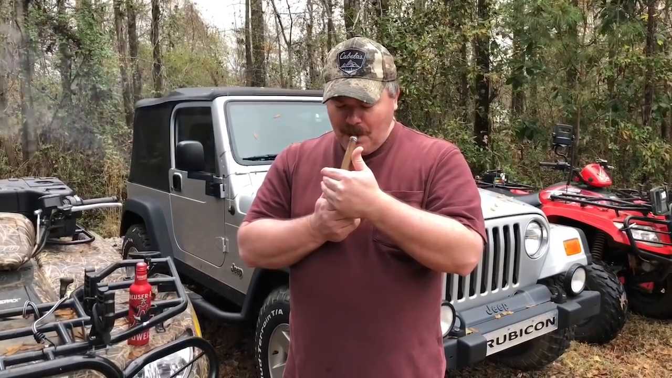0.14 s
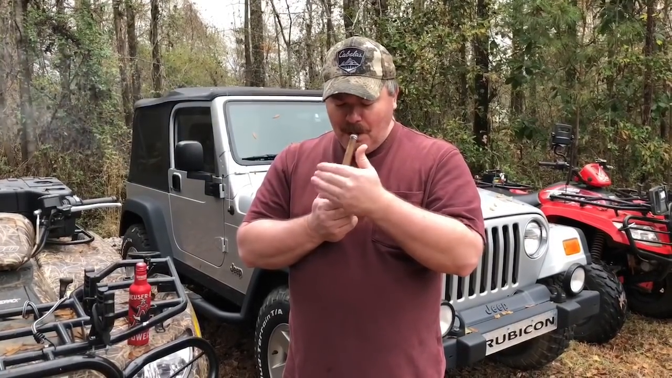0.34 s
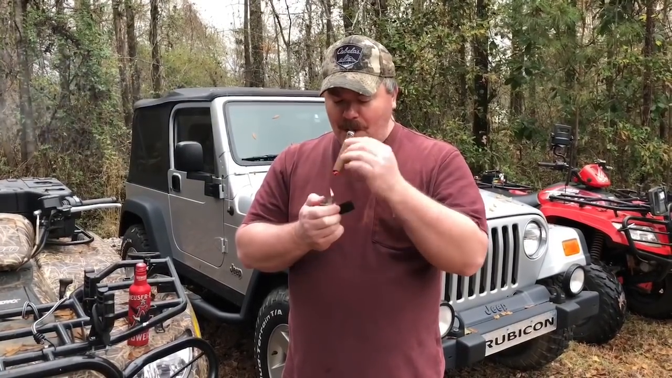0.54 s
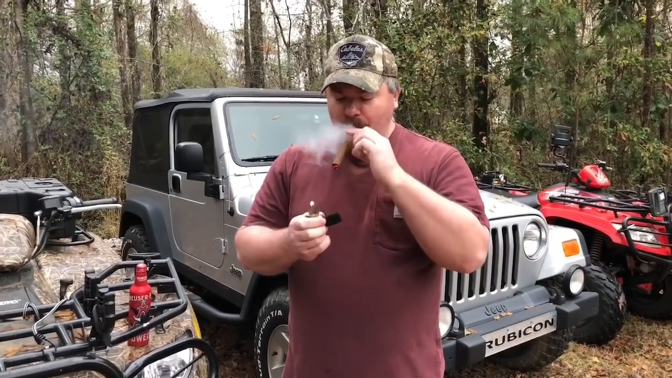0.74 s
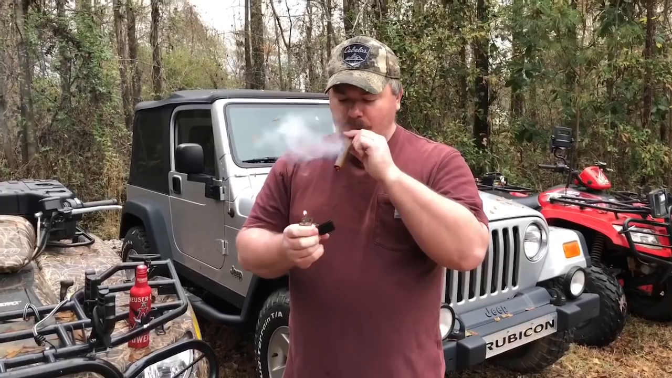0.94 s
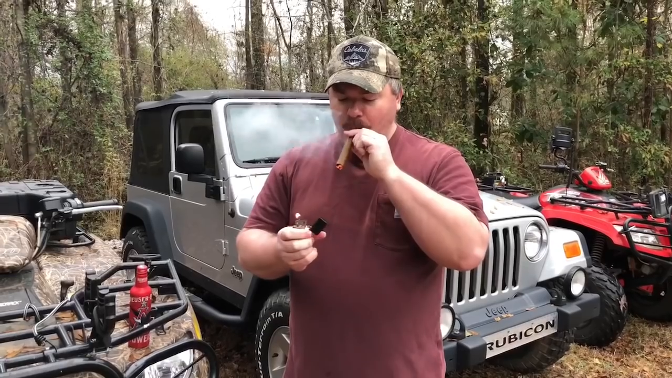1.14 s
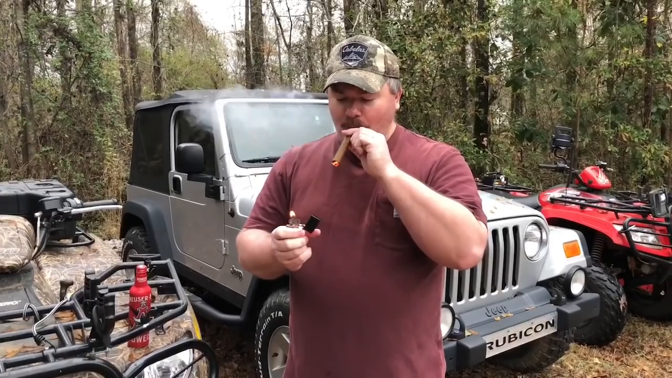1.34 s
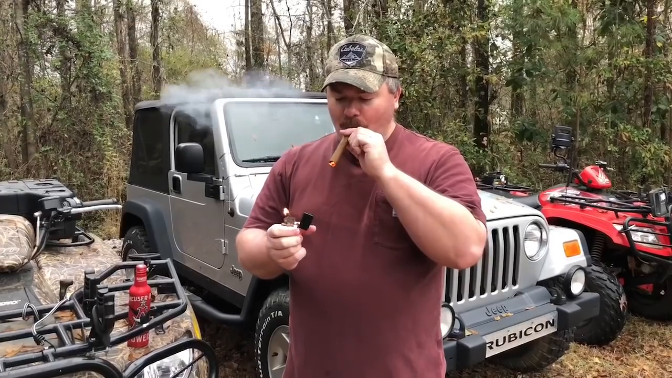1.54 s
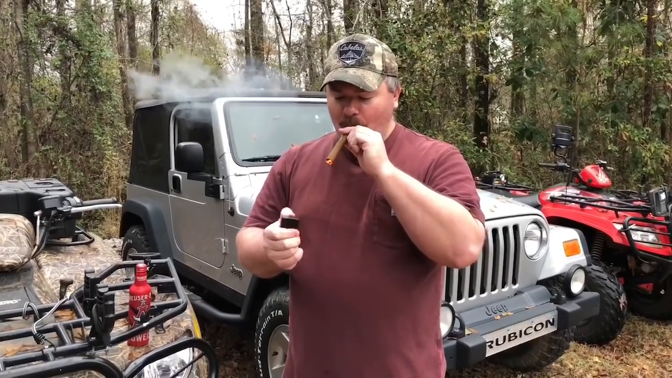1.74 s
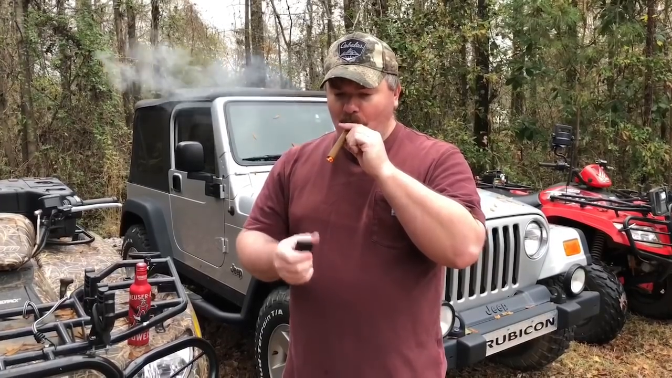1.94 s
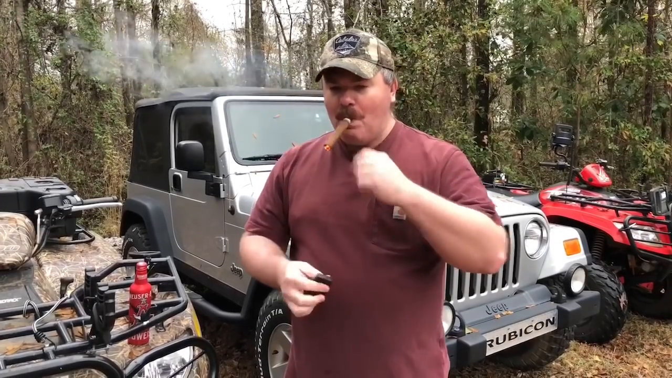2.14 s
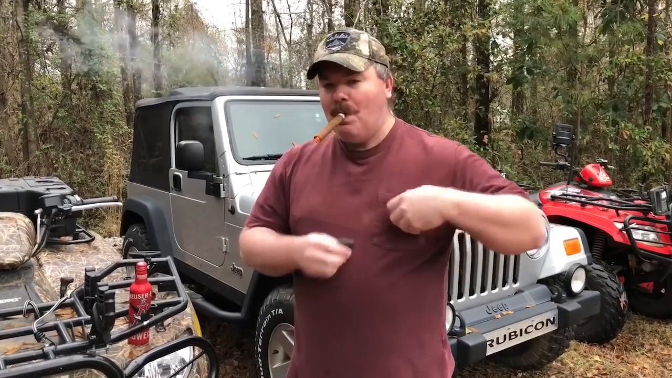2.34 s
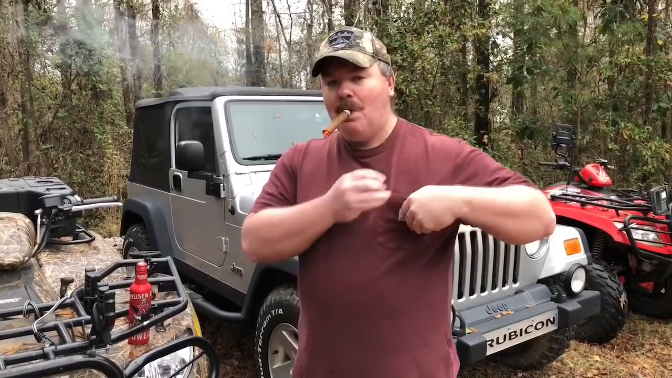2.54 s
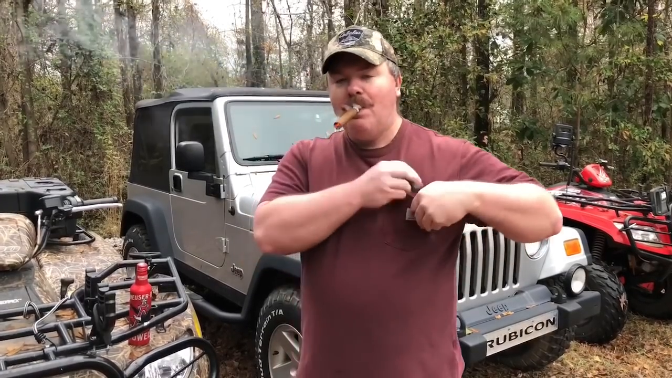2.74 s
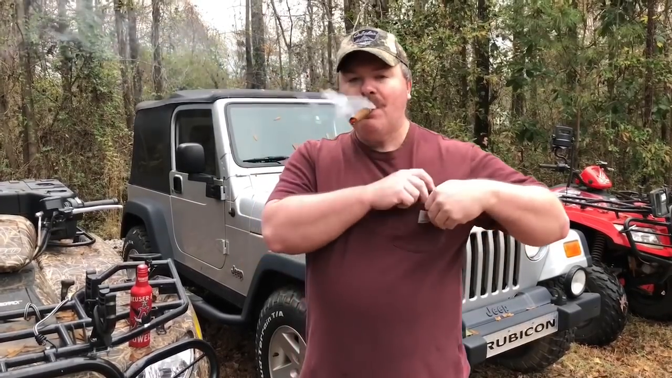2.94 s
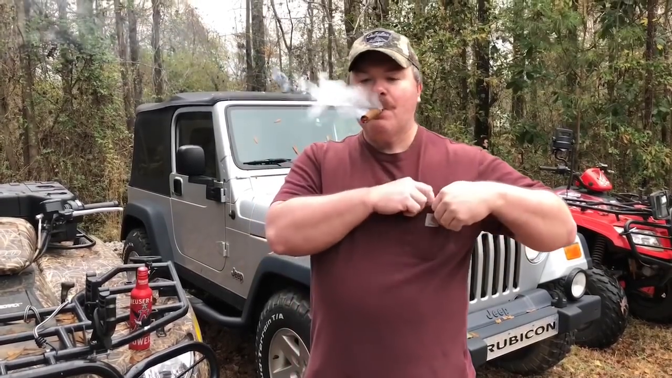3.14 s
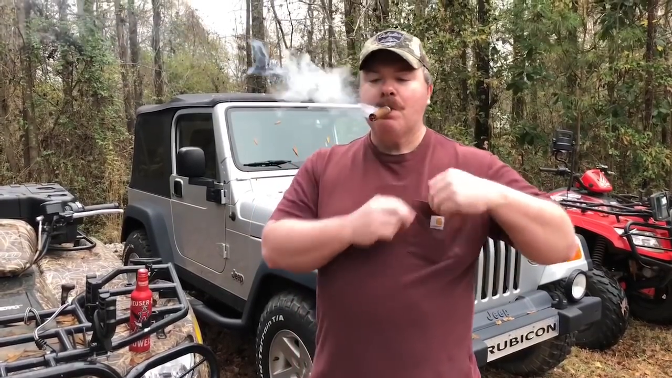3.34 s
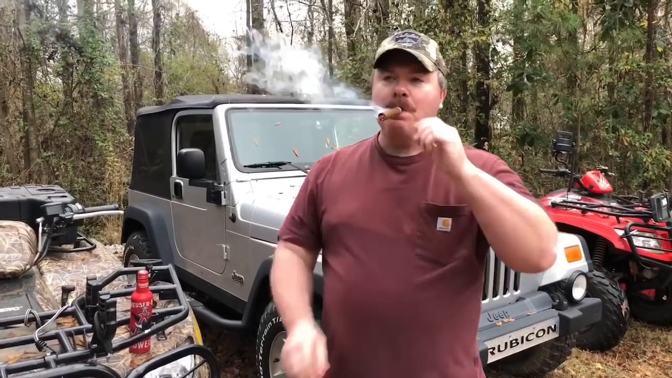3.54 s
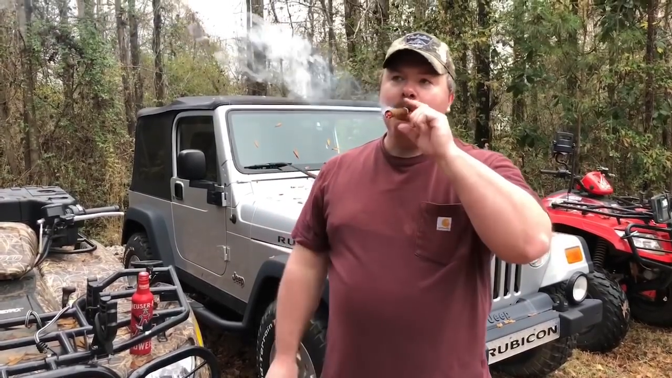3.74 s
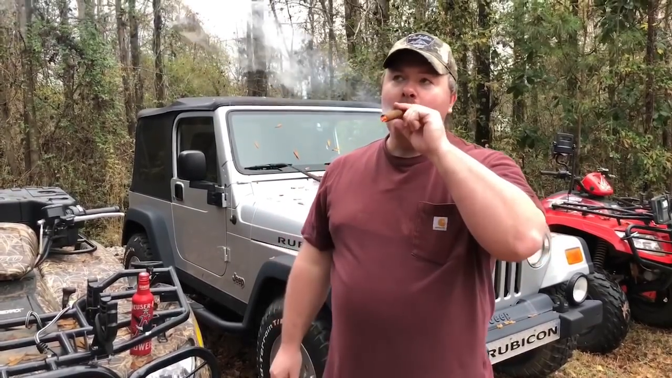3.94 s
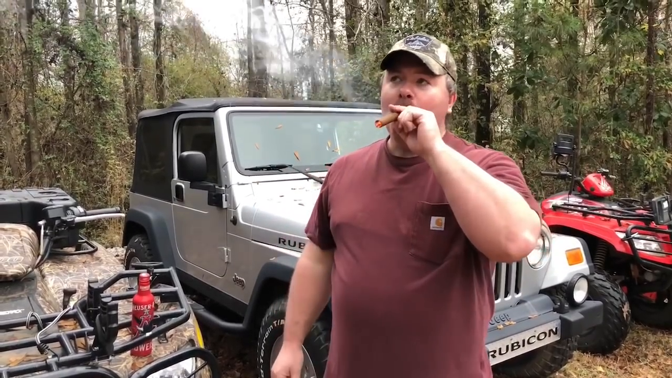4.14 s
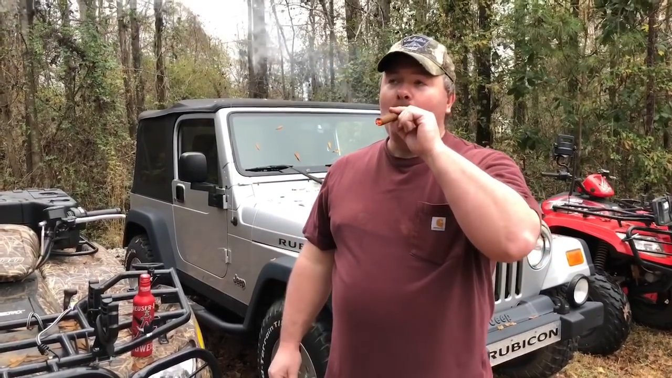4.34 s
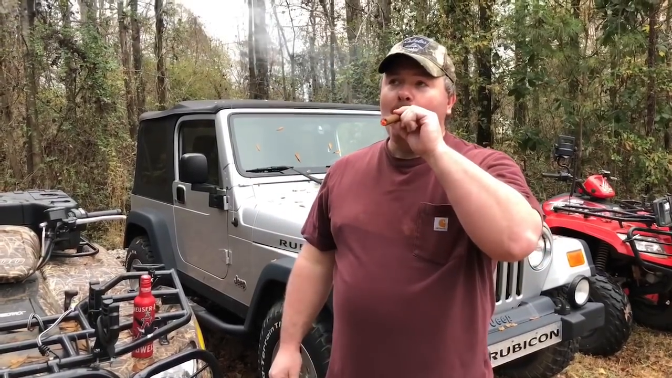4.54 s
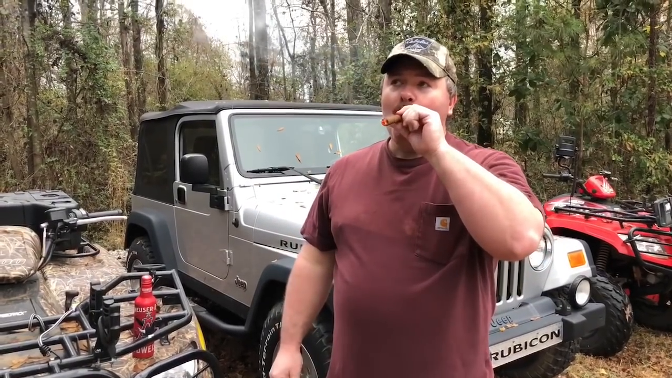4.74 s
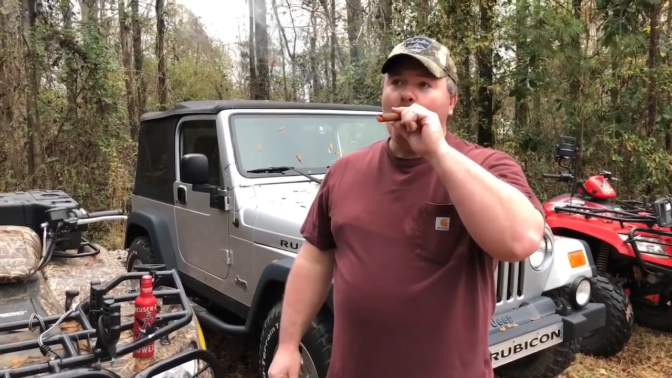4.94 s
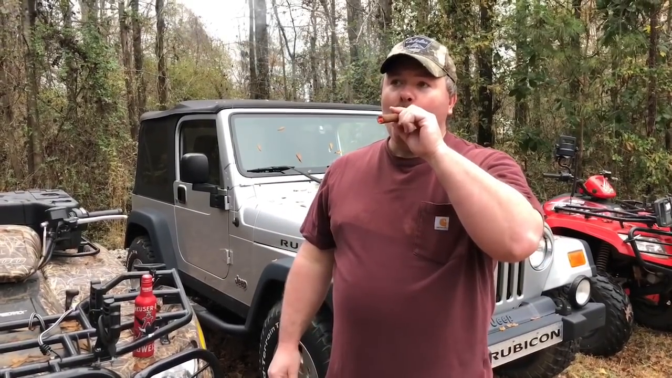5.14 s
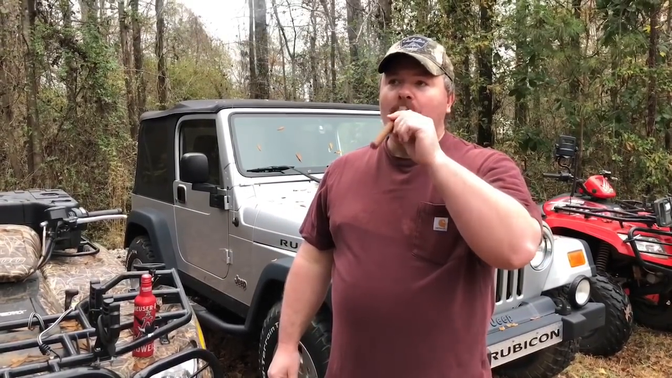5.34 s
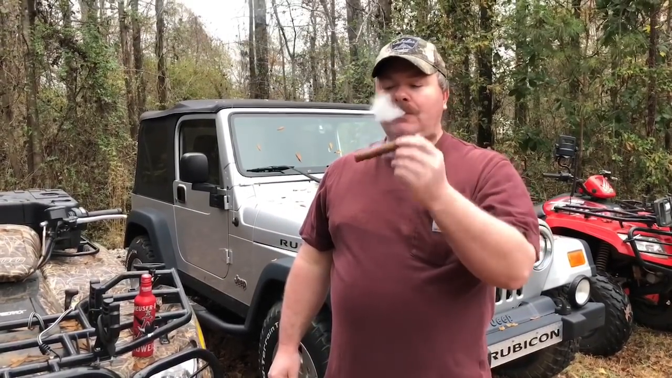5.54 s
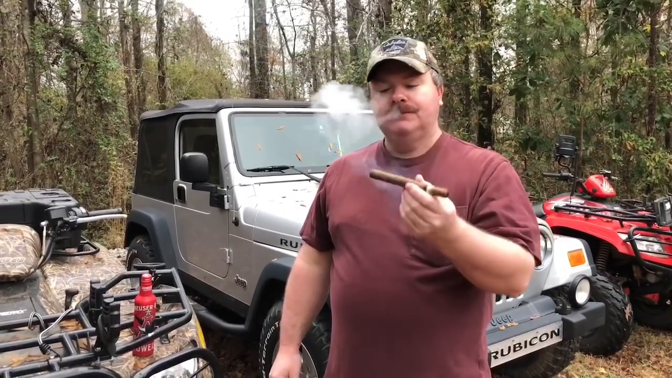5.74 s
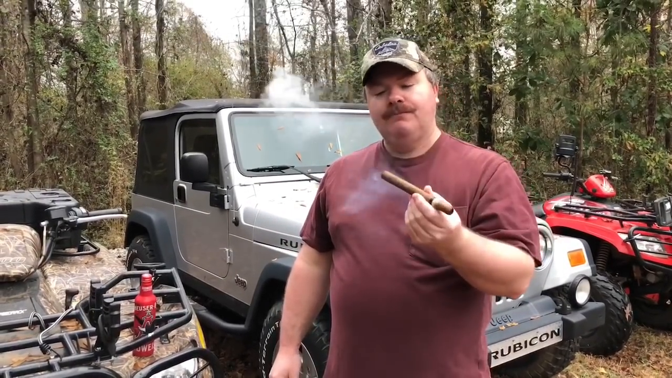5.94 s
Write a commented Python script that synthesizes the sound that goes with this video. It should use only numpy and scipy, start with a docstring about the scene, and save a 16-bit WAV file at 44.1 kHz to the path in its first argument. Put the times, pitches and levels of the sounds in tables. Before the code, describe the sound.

Quiet woodland air with a low distant traffic murmur; a metal lid clicks shut loudly once, then faint fumbling ticks and sparse thin birdsong.

```python
"""A small metal lighter lid snaps shut a few metres away, in a wood beside parked vehicles: a burst of
contacts excites the damped modes of lid and case, and vehicles, ground and trunks answer diffusely.
Two kinds of songbird whistle gliding tones among the trunks; fingers, cloth and leaves give short
noise puffs and a crackly brushing. A road murmurs as shaped noise, leaves rustle, a distant machine
hums as a drifting sine, a low fuzzy note comes and goes and the microphone hisses."""
import sys
import numpy as np
from scipy import signal
from scipy.fft import rfft, irfft, next_fast_len
from scipy.io import wavfile
from scipy.ndimage import uniform_filter1d, map_coordinates

SR = 44100
rng = np.random.default_rng(int(sys.argv[2]) if len(sys.argv) > 2 else 0)


def wav_record(signal):
    """Record a signal, one row per channel, as 16-bit PCM in the file named by sys.argv[1]."""
    frames = np.transpose(np.atleast_2d(signal))
    bounded = np.clip(frames, -1, 1)
    # unit amplitude maps onto the largest positive 16-bit level
    quanta = np.round(bounded * 32767).astype(np.int16)
    wavfile.write(sys.argv[1], SR, quanta)


N = 264776  # length in samples

# far road, level over time: time_s, rumble_db, tyre_db
ROAD_LEVELS = [(0.0, -48.5, -55), (0.45, -52, -54.5), (1.3, -50.5, -54), (2.26, -52, -53.5),
               (2.57, -49.5, -54), (6.0, -53, -55)]
# relative spectrum of the road rumble: frequency_hz, level_db
RUMBLE_SPECTRUM = [(15, -65), (28, -28.5), (40, -10.5), (53, -8), (61, 3), (70, -2.5), (95, 1), (125, -6),
                   (160, -6.5), (215, -13.5), (450, -24), (900, -63)]
# relative spectrum of the tyre wash: frequency_hz, level_db
TYRE_SPECTRUM = [(150, -31.5), (300, -6), (500, -5.5), (800, 2.5), (1400, -1), (2100, -9), (3000, -22),
                 (5000, -37.5)]
# relative spectrum of the leaves: frequency_hz, level_db
LEAF_SPECTRUM = [(1000, -24), (2500, 5.5), (4500, -1), (7000, -10.5), (10000, -24.5)]
# relative spectrum of the microphone self-noise: frequency_hz, level_db
HISS_SPECTRUM = [(2000, -16), (6000, 1), (8500, 1), (11500, -6), (14500, -4), (17200, -6)]
# level of the machine hum over time: time_s, level_db
HUM_LEVELS = [(0, -66.5), (1.3, -62.5), (2.8, -63), (3.3, -67), (6, -70.5)]
# swells of a faint airy rustle: peak_s, length_s, level_db
RUSTLE_SWELLS = [(.2, 0.55, -88), (4.82, 0.27, -83), (5.499, .4, -85.5)]
# faint ticks of fingers, cloth and leaves, and near 2.88 s a double click of the lighter dropping into a
# pocket: start_s, peak_db, centre_hz, width_octaves
TICK_EVENTS = [(.743, -58, 7500, 1), (.835, -59, 14000, 1), (.955, -67, 4000, 1), (1.668, -59, 13000, 1.5),
               (1.6795, -51, 12000, 1.5), (1.717, -59, 14000, 1), (1.929, -55.5, 8000, 1),
               (2.297, -62, 6000, .6), (2.361, -54.5, 4510, 0.63), (2.452, -60, 13000, 0.94),
               (2.49, -59.5, 14000, 1), (2.8375, -50, 3920, 0.4), (2.842, -55, 4000, .5),
               (2.8762, -53, 6500, .8), (2.8785, -45, 3100, .7), (2.894, -56, 4000, .6),
               (2.9858, -50, 13000, 1.4), (3.405, -56.5, 6020, 1), (3.695, -48, 14000, 1),
               (3.809, -58, 9000, .5), (3.852, -51, 5980, 1), (3.908, -45, 9070, 2.5),
               (3.947, -52, 12000, 1.6), (3.954, -58, 12000, 1.5), (3.985, -60.5, 10000, 1.5),
               (4.017, -57, 13000, 1), (4.071, -47.5, 6000, 1.5), (4.22, -54, 8980, 1.05),
               (4.257, -60.5, 9500, .6), (4.272, -55, 6000, 2)]
# thin high bird, a quick fall onto a held pitch: start_s, length_s, climb_s, top_hz, held_hz, level_db
HIGH_NOTES = [(.637, 0.036, .008, 8020, 7430, -57.5), (1.072, 0.03, .002, 8000, 7280, -70),
              (1.43, .04, 0.0018, 8200, 7640, -80), (2.643, 0.036, .002, 8370, 7300, -72),
              (3.038, 0.034, .002, 8800, 7420, -61.5), (4.975, 0.1, .002, 7900, 7480, -86),
              (5.085, 0.036, 0.0021, 7920, 7470, -82)]
# lower bird, a hooked note that shoots up and sags: start_s, length_s, climb_s, top_hz, end_hz, level_db
HOOKED_NOTES = [(3.549, 0.047, 0.015, 4650, 4120, -66.5), (3.907, 0.056, 0.012, 4580, 4270, -67),
                (4.198, 0.045, .013, 4600, 4300, -67.5), (4.495, 0.041, .012, 4420, 4220, -68.5),
                (4.983, 0.036, .012, 4480, 4150, -72)]
# fainter notes like the lower bird's, levels before the mix: start_s, length_s, start_hz, end_hz, level_db
FAR_NOTES = [(2.005, 0.062, 4760, 4450, -80), (2.1, .05, 4500, 4460, -83), (2.233, .03, 4520, 4200, -76),
             (2.32, .04, 3720, 3690, -85), (2.42, .05, 3885, 3900, -78.5), (2.5, .09, 4500, 4470, -83),
             (4.251, .023, 4400, 3190, -71), (4.56, .07, 4280, 4150, -85), (4.685, .035, 3900, 3900, -79),
             (4.905, .035, 3760, 3620, -82), (5.02, .14, 4490, 4480, -82), (5.21, .035, 4660, 4070, -72),
             (5.298, 0.062, 4020, 4000, -82.5)]
# lid contacts, levels before the common gain; tilt pivots on 4 kHz and is flat below 1 kHz:
# start_s, level_db, tilt_db_per_octave, rattle_t60_s
LID_CONTACTS = [(1.7215, -50, -9.5, .01), (1.743, -46.5, 1.5, .004), (1.7494, -35, -3.5, 0.0065),
                (1.761, -46.5, -7.5, .01), (1.7636, -21, 5.5, 0.022), (1.7655, -21, 5, 0.025),
                (1.7656, -1, -1, 0.0045), (1.7653, -18.5, 4, 0.00797), (1.7678, -17, 2, .008)]
# resonant modes of lid and case: centre_hz, width_hz, relative_level_db
CASE_MODES = [(1304, 170, -7), (1817, 130, 0.5), (1945, 45, -2.5), (2340, 8, -8), (2380, 35, -5),
              (2750, 200, -2), (3220, 120, -8.5), (4100, 750, -0.7), (4900, 420, -2), (6200, 690, -5),
              (8700, 380, -11.5), (10055, 450, -1.5), (12350, 320, -5), (15100, 455, -1), (15730, 370, -9),
              (16700, 450, -3)]
# the snap summed over all directions: frequency_hz, level_db
SNAP_POWER = [(800, -39.5), (1300, 2), (2400, 4.5), (5000, 2), (8000, -1.5), (10000, 1), (12000, 1.5),
              (17000, 4)]
# strokes of cloth brushing as arms move: peak_s, peak_db, fade_db_per_s
CLOTH_STROKES = [(2.41, -76, 70), (3.15, -76, 120), (3.29, -81, 110.5), (3.94, -73, 80), (4.26, -83, 110),
                 (4.89, -86, 80)]
# decay of the answer from vehicle bodies and ground: frequency_hz, t60_s
VEHICLE_DECAY = [(1000, 0.066), (3000, 0.062), (16000, 0.034)]
# decay of the answer from the trunks: frequency_hz, t60_s
TRUNK_DECAY = [(1000, 0.84), (4500, .6), (8000, 0.48), (16000, 0.22)]
# decay of the answer from branches around the birds: frequency_hz, t60_s
BRANCH_DECAY = [(3000, .12), (9000, 0.13)]

AIR_HZ = 17500  # noise beds, ticks, hinge scrape and echo tails are cut above this
TOP_HZ, HEADROOM = 19084, .8  # band limit and soft ceiling (full scale = 1) of the input stage
LEAVES_DB = -73.5
HUM_HZ, HUM_DRIFT_HZ = 293.9, 1.3
DRONE_DB, DRONE_SWING_DB, DRONE_PER_S = -68.5, 5, 4.5
STRAY_PER_S, STRAY_LOWEST_DB, STRAY_HZ = 1.5, -67, 11000  # fainter ticks at random moments
# a falling tick ahead of each hooked note; its level is relative to that note
LEAD_BEFORE_S, LEAD_S, LEAD_TOP_HZ, LEAD_END_HZ, LEAD_DB = .033, 0.0127, 5500, 3500, -5
ONSET_S = .002  # time that notes without a climb stay on their top pitch
SWING_S, SWING_LENGTH_S, SWING_DB = 1.7505, .0128, -46.5  # the hinge scrapes while the lid swings
RATTLE = .07  # starting rms of the loose chatter after a contact, relative to the blow
BRUSH_RISE_DB_PER_S = 250


def amp(db):
    """Decibel law: twenty dB is a tenfold amplitude."""
    return 10 ** (np.asarray(db) / 20)


def unit(x):
    """Power normalisation: the rms becomes 1."""
    return x / np.sqrt(np.mean(x ** 2) + 1e-20)


def along(points, hz):
    """Logarithmic frequency scale: values interpolate linearly between points in log frequency."""
    f, v = np.transpose(points)
    return np.interp(np.log(hz + 1), np.log(f + 1), v)


def curves(rows):
    """Linear interpolation in time: each column after the time becomes one value per sample."""
    s, *columns = np.transpose(rows)
    return [np.interp(np.arange(N) / SR, s, column) for column in columns]


def wobble(rate):
    """Band-limited fluctuation: a spline through random knots, rate of them a second."""
    knots = rng.standard_normal(int(N * rate / SR) + 4)
    return map_coordinates(knots, [np.arange(N) * rate / SR])


def ramp(s, length, attack, release):
    """Amplitude envelope: linear attack, hold and linear release, over the whole track."""
    t = np.arange(N) / SR - s
    return np.clip(np.minimum(t / attack, (length - t) / release), 0, 1)


def sine(hz):
    """Frequency modulation: phase is the running sum of frequency; the rms is about 1."""
    return np.sqrt(2) * np.sin(2 * np.pi * np.cumsum(hz) / SR)


def filtered(x, response):
    """Linear filtering: the spectrum of x is multiplied by a complex response of frequency."""
    m = next_fast_len(len(x) + 8192)
    return irfft(rfft(x, m) * response(np.fft.rfftfreq(m, 1 / SR)), m)[:len(x)]


def rush(spectrum, patchy_db):
    """Random noise shaping: time-frequency patches of random gain, then a colour, at rms 1."""
    z = signal.stft(rng.standard_normal(N), nperseg=512)[2]
    field = uniform_filter1d(rng.standard_normal(z.shape), size=6, axis=0)  # blurred in frequency
    field = uniform_filter1d(field, size=14, axis=1)  # blurred in time
    patchy = signal.istft(z * amp(patchy_db * unit(field)), nperseg=512)[1][:N]
    return unit(filtered(patchy, lambda hz: amp(along(spectrum, hz)) * (hz < AIR_HZ)))


def echoes(x, decays, delay):
    """Diffuse reverberation: convolution with noise whose frequencies each decay at their own t60."""
    hz, t, z = signal.stft(rng.standard_normal(SR // 2), SR, nperseg=128)
    z = z * amp(-60 * t / along(decays, hz)[:, None]) * (hz < AIR_HZ)[:, None]
    tail = signal.istft(z, SR, nperseg=128)[1]
    delayed = np.pad(x, (round(delay * SR), 0))
    return signal.fftconvolve(delayed, tail / np.linalg.norm(tail))[:N]


def add(track, s, sound):
    """Superposition: a short sound is summed into the track at time s."""
    part = track[round(s * SR):][:len(sound)]
    part += sound[:len(part)]


def road():
    """Broadband traffic noise: a low rumble and a mid-band tyre wash fluctuate independently."""
    rumble_db, tyre_db = curves(ROAD_LEVELS)
    rumble = amp(rumble_db + 0.83 * wobble(7.6)) * rush(RUMBLE_SPECTRUM, patchy_db=1.0)
    tyres = amp(tyre_db + .5 * wobble(4.5)) * rush(TYRE_SPECTRUM, patchy_db=0.88)
    return rumble + tyres


def leaves():
    """Foliage noise: coloured random noise whose level drifts slowly."""
    return amp(LEAVES_DB + 0.807 * wobble(2.5)) * rush(LEAF_SPECTRUM, patchy_db=1.5)


def hum():
    """Tonal machine noise: a single sine drifting in pitch and level."""
    level_db = curves(HUM_LEVELS)[0] + .8 * wobble(2.8)
    return amp(level_db) * sine(HUM_HZ + HUM_DRIFT_HZ * wobble(1.2))


def drone():
    """Narrow-band noise: a few hertz of bandwidth is heard as a fuzzy note, here coming and going."""
    level = amp(DRONE_DB + DRONE_SWING_DB * wobble(DRONE_PER_S))
    return level * rush([(170, -36), (183, 9.5), (190, 11.0), (203, -48)], patchy_db=3.0)


def hiss():
    """Self-noise: the microphone adds faint coloured random noise."""
    return amp(-86) * rush(HISS_SPECTRUM, patchy_db=1.5)


def rustle():
    """Amplitude-modulated noise: bell-shaped swells of an airy treble band."""
    t = np.arange(N) / SR
    level = sum(amp(db) * np.exp(-(2 * (t - s) / length) ** 2) for s, length, db in RUSTLE_SWELLS)
    airy = rush([(3500, -30), (5500, -3), (7300, 3), (8800, -12), (11000, -40)], patchy_db=3)
    return level * amp(2.5 * wobble(15)) * airy


def ticks():
    """Band-passed transient: a click with a short decaying puff of noise fills a broad band."""
    out, t = np.zeros(N), np.arange(400) / SR
    lead_in = 40  # samples of room before the click for the filter's symmetric response
    when, size, pitch = rng.random((round(STRAY_PER_S * N / SR), 3)).T
    stray_s = .01 + when * (N / SR - .02)
    stray_hz = STRAY_HZ * 2 ** (pitch - .5)  # within half an octave either way
    stray = zip(stray_s, STRAY_LOWEST_DB + 4 * size, stray_hz, np.ones(len(when)))
    for s, db, hz, octaves in [*TICK_EVENTS, *stray]:
        def band(f):
            return np.exp(-(np.log2((f + 1) / hz) / octaves) ** 2) * (f < AIR_HZ)

        puff = 0.37 * amp(-60 * t / 0.0047) * rng.standard_normal(len(t))
        puff[0] = 1
        puff = filtered(np.pad(puff, (lead_in, 0)), band)
        add(out, s - lead_in / SR, amp(db) * puff / np.abs(puff).max())
    return out


def whistle(notes, fall_s, hook_hz, attack, release, flutter_db, waver_hz):
    """Gliding tone: pitch climbs to its top, falls along a half cosine and holds, all unsteadily."""
    out, waver, t = np.zeros(N), waver_hz * wobble(250), np.arange(N) / SR
    for s, length, climb, top_hz, end_hz, db in notes:
        age = np.clip(t - s, 0, length)
        fall = np.clip((age - climb) / min(fall_s, length - climb), 0, 1)
        glide = end_hz + (top_hz - end_hz) * (1 + np.cos(np.pi * fall)) / 2
        hook = hook_hz * np.clip(1 - age / climb, 0, 1) ** 2  # starts this far below the glide
        out += amp(db) * ramp(s, length, attack, release) * sine(glide - hook + waver)
    return out * amp(flutter_db * wobble(150))


def high_bird():
    """Fast downward glide: thin calls dropping onto a held pitch."""
    return whistle(HIGH_NOTES, fall_s=.018, hook_hz=500, attack=.015, release=.009,
                   flutter_db=0.5, waver_hz=40)


def far_bird():
    """Amplitude and pitch flutter: strong random modulation blurs the fainter notes."""
    notes = [(s, length, ONSET_S, *rest) for s, length, *rest in FAR_NOTES]
    return whistle(notes, fall_s=0.0303, hook_hz=0, attack=.008, release=.011,
                   flutter_db=5.5, waver_hz=140)


def hooked_bird():
    """Up-down glide: each note shoots up and sags, preceded by a brief falling tick."""
    leads = [(s - LEAD_BEFORE_S, LEAD_S, ONSET_S, LEAD_TOP_HZ, LEAD_END_HZ, db + LEAD_DB)
             for s, *_, db in HOOKED_NOTES]
    calls = whistle(HOOKED_NOTES, fall_s=0.0239, hook_hz=1000, attack=.008, release=.006,
                    flutter_db=3.0, waver_hz=70.1)
    return calls + whistle(leads, fall_s=LEAD_S, hook_hz=0, attack=.005, release=.003,
                           flutter_db=0.0, waver_hz=40)


def birds():
    """Direct and reverberant sound: strong answers from trunks and branches make the birds distant."""
    high, far, hooked = high_bird(), far_bird(), hooked_bird()
    out = high + amp(-7) * echoes(high, TRUNK_DECAY, delay=0.0074)
    out += hooked + amp(-6) * echoes(hooked, TRUNK_DECAY, delay=0.027)
    out += amp(-6) * echoes(high + hooked, BRANCH_DECAY, delay=.003)
    return out + amp(-4) * far + echoes(far, TRUNK_DECAY, delay=0.0043)


def case_modes(f):
    """Modal superposition: damped resonances of alternating sign add up to the case's response."""
    total = 0
    for k, (centre, width, db) in enumerate(CASE_MODES):
        damping = 1j * f * width
        total = total + (-1) ** k * amp(db) * damping / (centre * centre - f * f + damping)
    return total


def small_body(f):
    """Radiation efficiency: so small a body radiates no bass and little at the very top."""
    return (1j * f / (1j * f + 800)) ** 4 * amp(along([(17200, 4.5), (17700, -24), (19000, -28.5)], f))


def lid_snap():
    """Impact excitation: a hinge scrape, then blows with short rattles, ring the metal case."""
    t = np.arange(SR // 4) / SR
    scrape = filtered(rng.standard_normal(N), lambda f: (case_modes(f) + 0.24) * (f < AIR_HZ))
    out = amp(SWING_DB) * ramp(SWING_S, SWING_LENGTH_S, attack=.0006, release=.0006) * unit(scrape)
    for s, db, tilt_db, t60 in LID_CONTACTS:
        def ringing(f):
            tilt = amp(tilt_db * np.log2(np.clip(f, 1000, SR) / 4000))
            return tilt * (case_modes(f) + 0.18)  # the constant is the direct, unresonant blow

        blow = RATTLE * amp(-60 * t / t60) * rng.standard_normal(len(t))
        blow[0] = 1
        add(out, s, amp(db + 16.5) * filtered(blow, ringing))
    return filtered(out, small_body)


def main_blow():
    """Radiated power: the strongest contact as one impulse coloured by the sum over all directions."""
    s, db = max(LID_CONTACTS, key=lambda row: row[1])[:2]
    impulse = amp(db) * signal.unit_impulse(N, round(s * SR))
    return filtered(impulse, lambda f: amp(along(SNAP_POWER, f)))


def lighter():
    """Direct and reverberant sound: the snap, a short answer from vehicles and ground, a long one from trunks."""
    snap, blow = lid_snap(), main_blow()
    near = amp(-3.5) * echoes(blow, VEHICLE_DECAY, delay=0.0023)
    return snap + near + amp(-19) * echoes(blow + amp(-11) * snap, TRUNK_DECAY, delay=.012)


def cloth():
    """Friction noise: each stroke of fabric is a crackly treble hiss that rises fast and fades."""
    t = np.arange(N) / SR
    level = 0
    for s, db, fade_db in CLOTH_STROKES:
        below_peak_db = np.maximum(BRUSH_RISE_DB_PER_S * (s - t), fade_db * (t - s))
        level = level + amp(db - below_peak_db)
    crackle = amp(4 * wobble(300) + 2.5 * wobble(40))
    return level * unit(crackle * rush([(2000, -32), (7000, 0), (14000, -4), (17200, 4)], patchy_db=3))


def scene():
    """Superposition: the pressures of all sources add in one channel."""
    background = road() + leaves() + hum() + drone() + hiss()
    return (background + rustle() + ticks() + birds() + lighter() + cloth())[None]


def record(dry):
    """Saturation: the input stage rounds off the highest peaks, then a band limit cuts the top."""
    rounded = dry[0] / (1 + np.abs(dry[0] / HEADROOM) ** 4) ** (1 / 4)
    return filtered(rounded, lambda hz: hz < TOP_HZ)[None]


dry = scene()
out = record(dry)
wav_record(out)
```